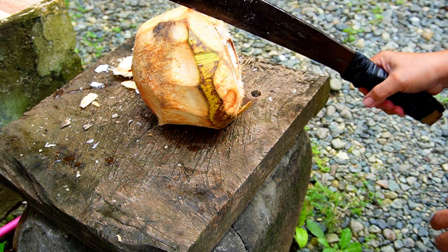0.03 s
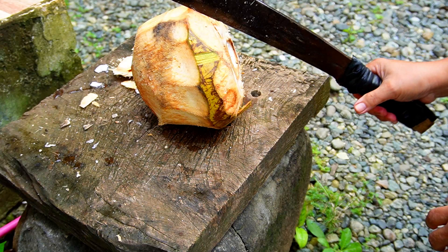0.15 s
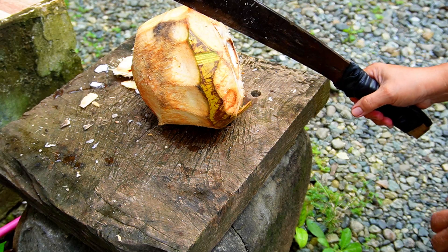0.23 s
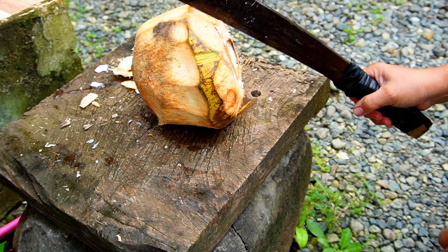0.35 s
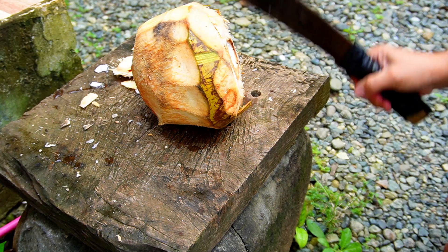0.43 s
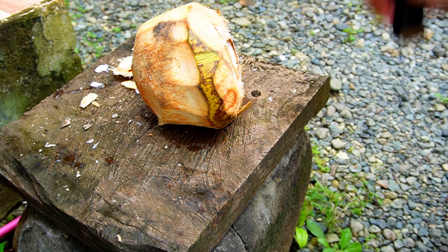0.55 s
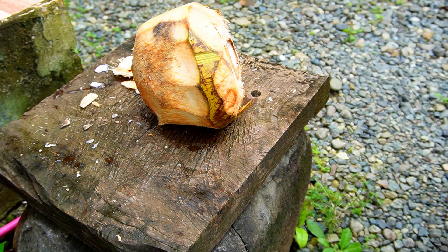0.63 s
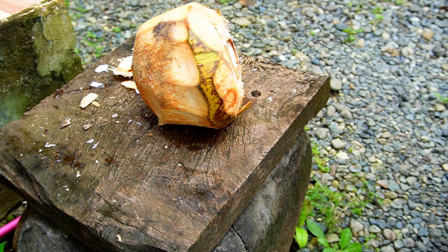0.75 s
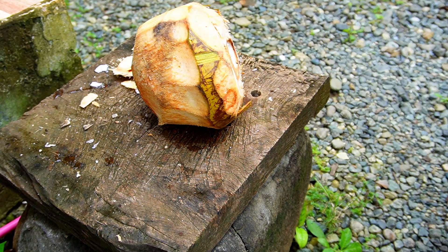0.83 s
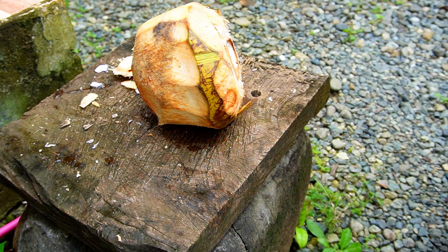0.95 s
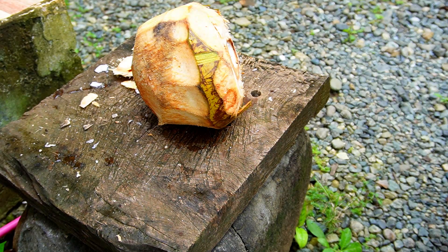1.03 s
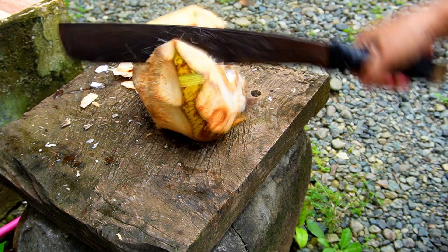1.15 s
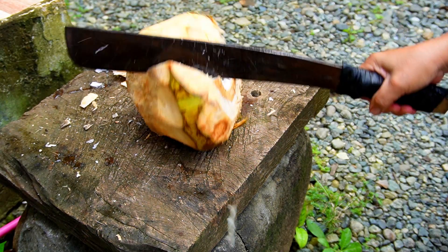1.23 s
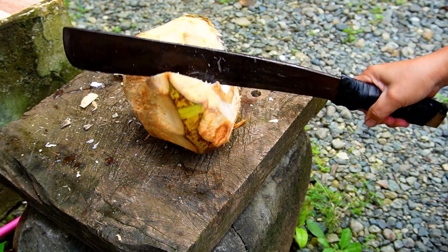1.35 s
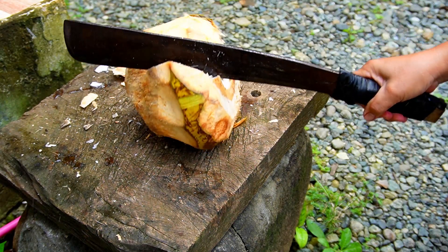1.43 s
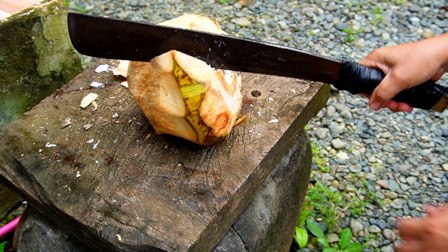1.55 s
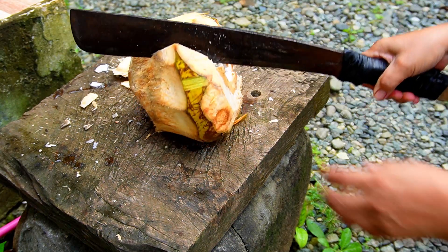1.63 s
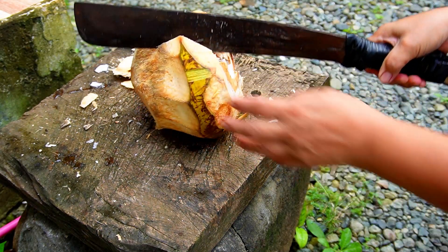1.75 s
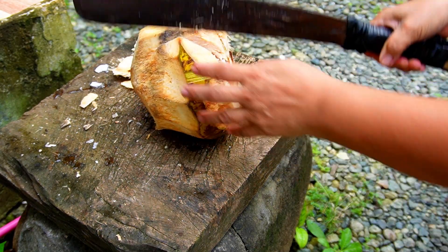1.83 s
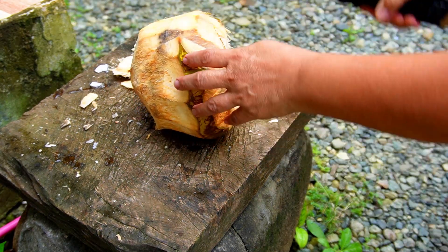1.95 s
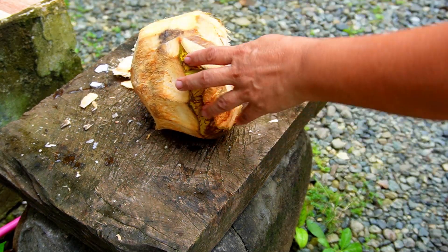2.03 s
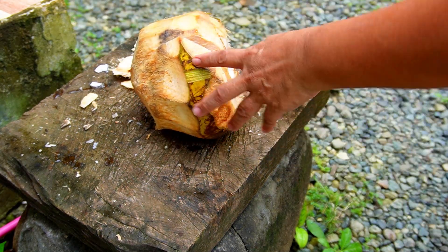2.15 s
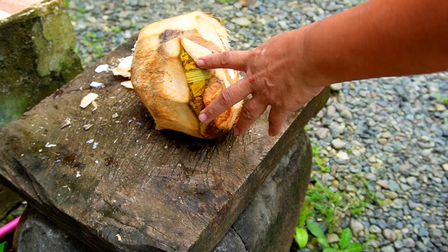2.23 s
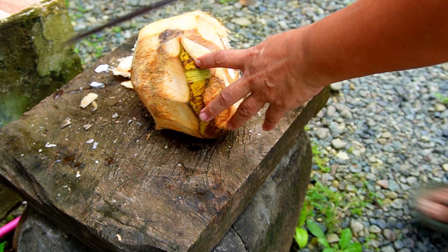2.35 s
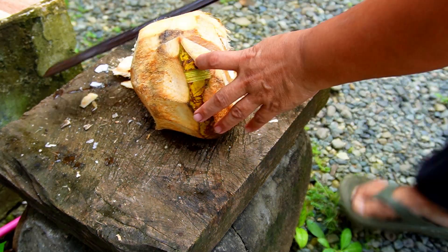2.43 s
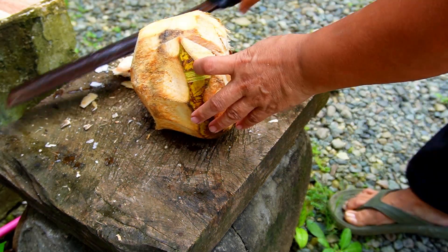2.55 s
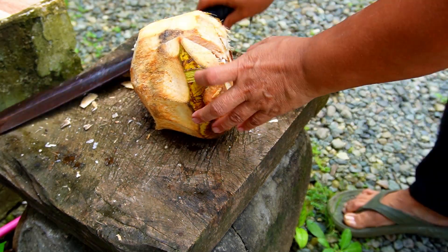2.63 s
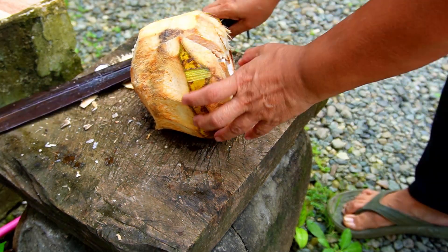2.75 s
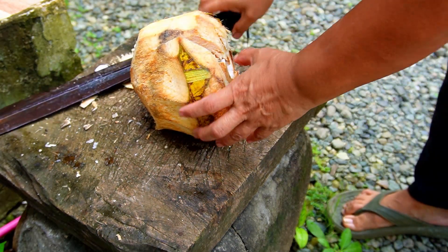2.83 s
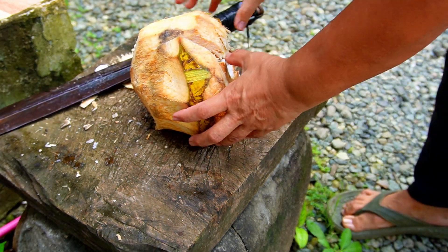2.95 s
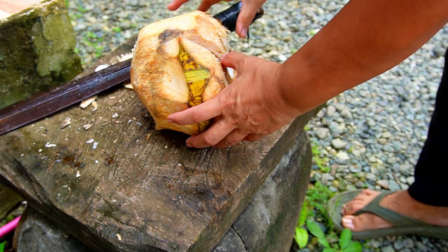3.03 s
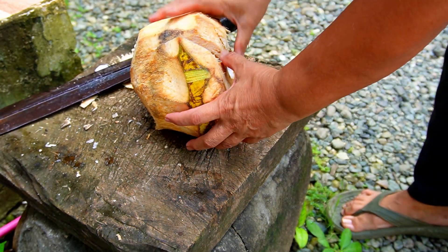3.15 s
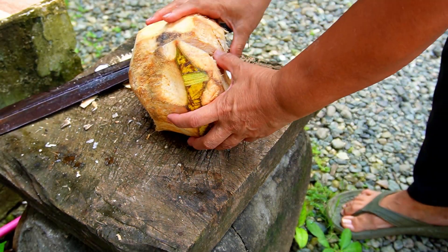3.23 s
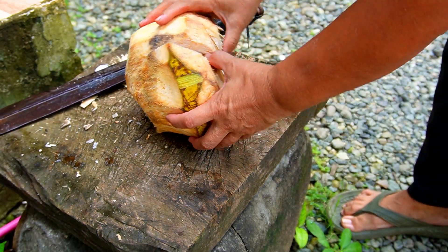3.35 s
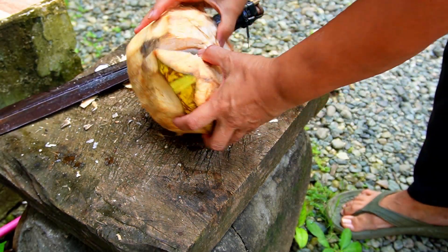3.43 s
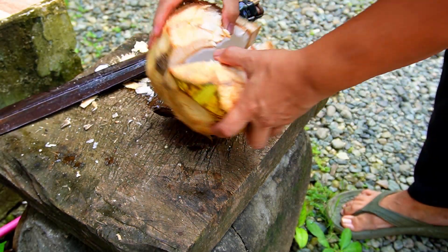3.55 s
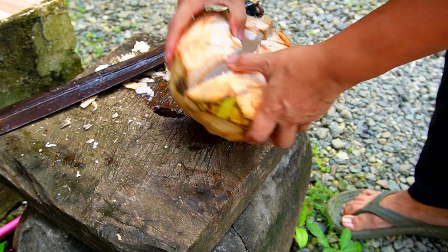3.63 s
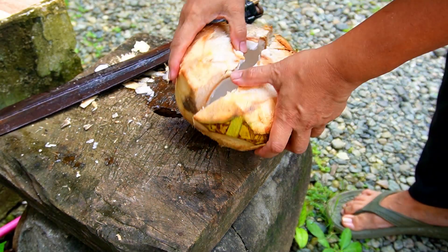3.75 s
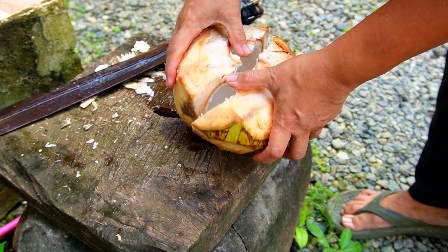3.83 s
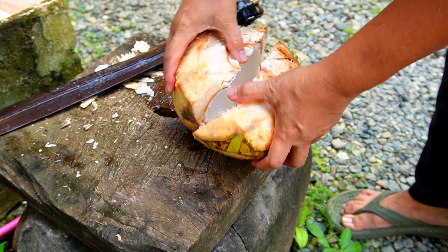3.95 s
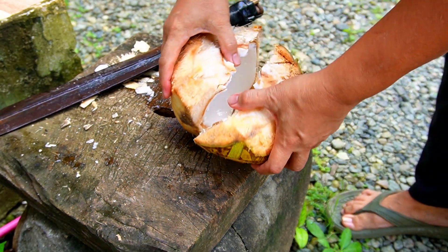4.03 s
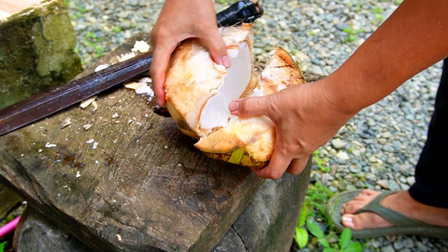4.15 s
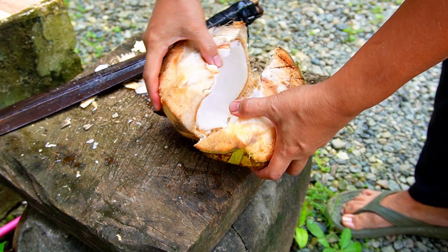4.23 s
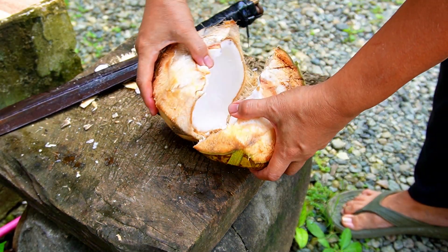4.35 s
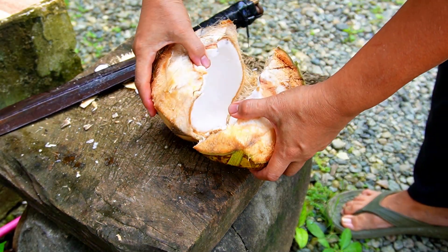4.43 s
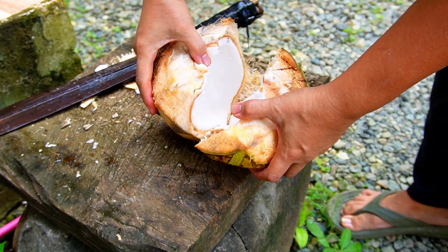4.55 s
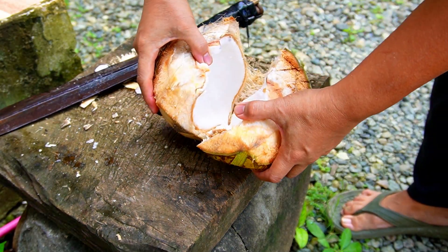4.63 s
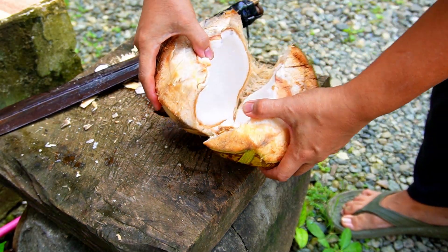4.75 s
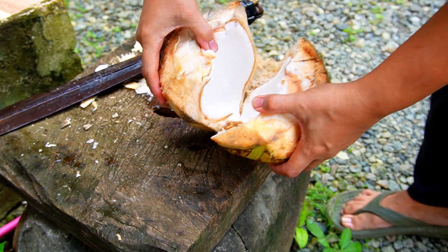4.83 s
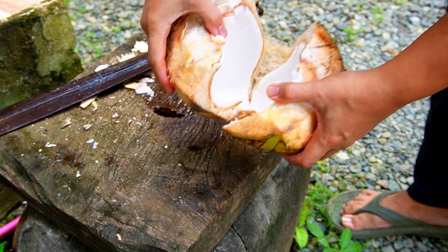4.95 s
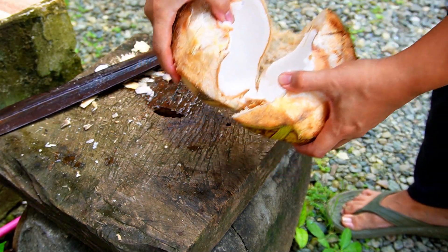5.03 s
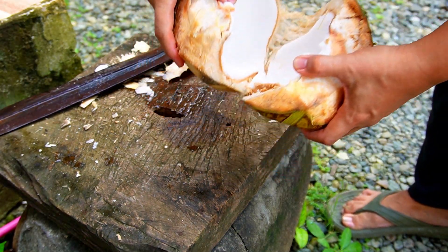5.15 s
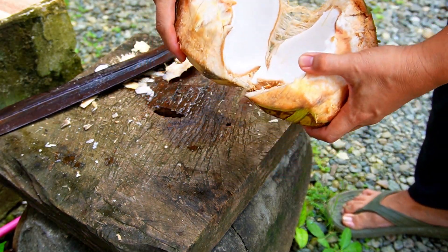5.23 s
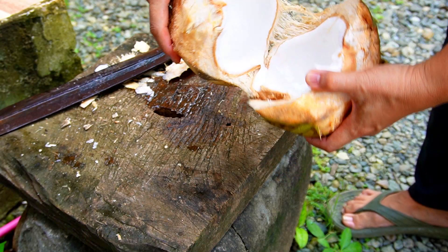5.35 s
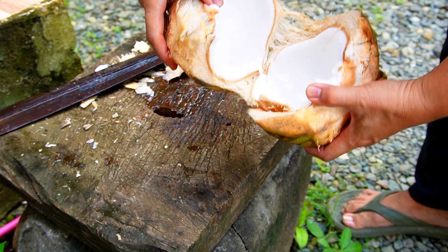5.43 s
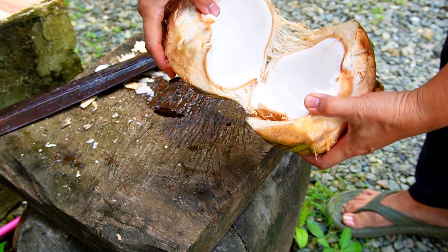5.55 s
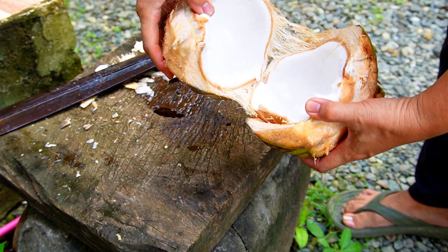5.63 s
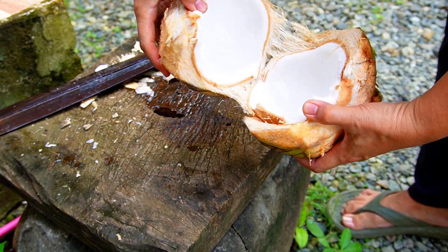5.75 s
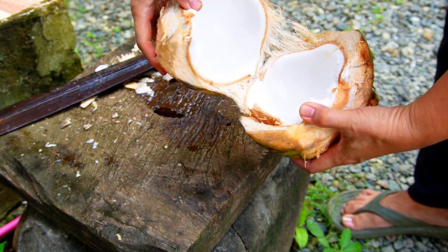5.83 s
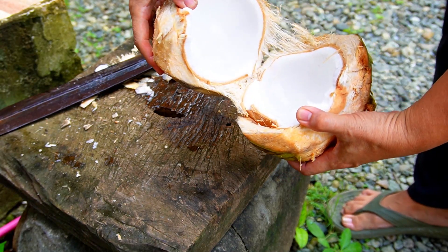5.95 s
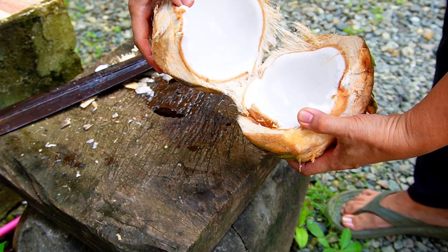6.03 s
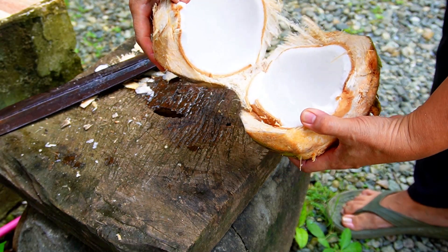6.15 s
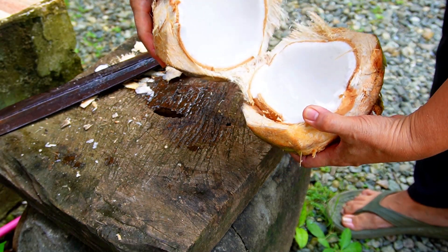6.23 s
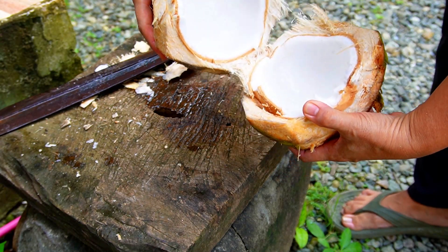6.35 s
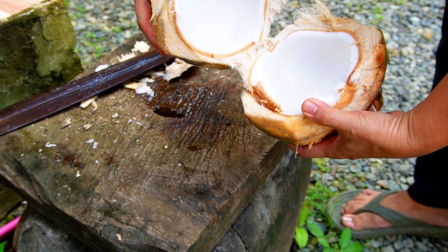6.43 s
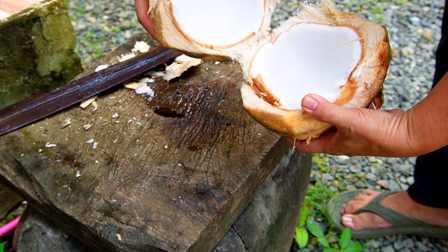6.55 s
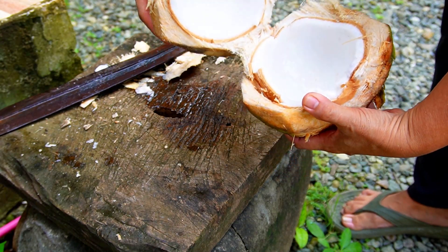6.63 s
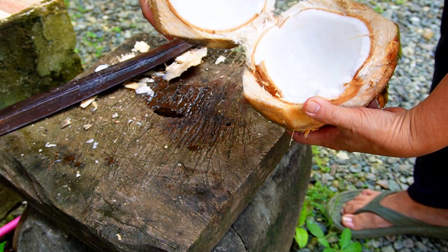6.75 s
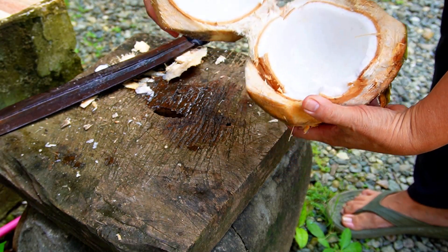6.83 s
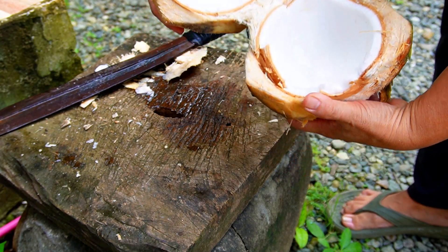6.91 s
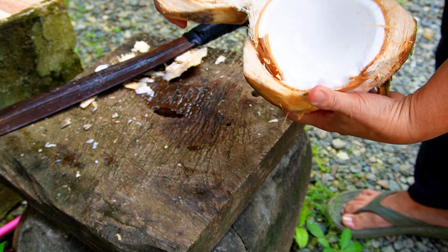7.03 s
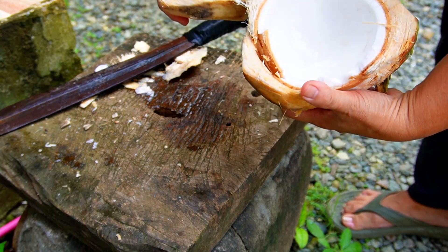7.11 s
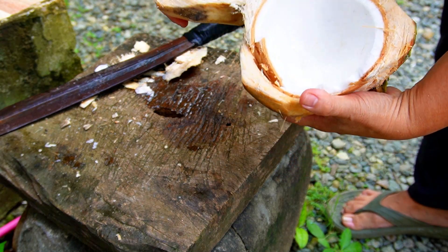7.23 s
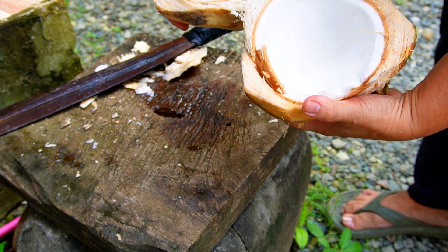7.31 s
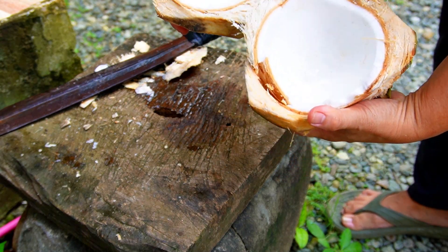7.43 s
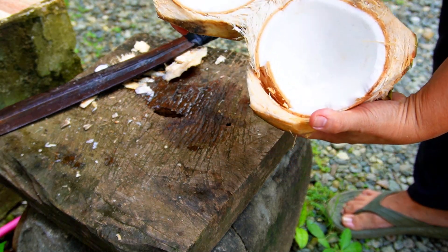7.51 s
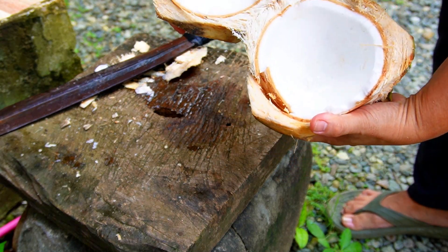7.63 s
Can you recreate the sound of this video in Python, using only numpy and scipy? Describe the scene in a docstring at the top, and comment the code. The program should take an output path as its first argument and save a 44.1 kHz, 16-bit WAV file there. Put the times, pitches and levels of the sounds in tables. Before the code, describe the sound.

A machete chops sharply into a husked coconut outdoors, then the blade clatters on wood and fibres rip and snap as the halves are pulled apart.

```python
"""A machete splits a husked coconut on a wooden block in a gravel yard, close to the microphone.
The edge cracks the shell and crunches through fibre; the blade is put down and knocks and rattles on the
ringing block. Sandals grind pebbles, hands rub the husk and pull the nut apart, fibres snap, water drips.
Behind: leaves in a breeze, a bird whistling falling notes and a slow engine thudding far away.
Grains, bursts and damped modes make the near sounds; echoes of the yard surround them."""
import sys
import numpy as np
from scipy import signal
from scipy.io import wavfile
from scipy.ndimage import map_coordinates

SR = 44100
rng = np.random.default_rng(int(sys.argv[2]) if len(sys.argv) > 2 else 0)


def persist_wave(psi):
    """Save psi, clipped to +-1, as 16-bit WAV."""
    counts = np.round(np.clip(psi, -1, 1) * 32767).astype(np.int16)
    wavfile.write(sys.argv[1], SR, np.atleast_2d(counts).T)


N = 338688
TIME = np.arange(N) / SR
SHORT = TIME[:4096]  # time axis of one brief sound, 93 ms


def amp(db):
    """Decibels to gain."""
    return 10 ** (np.asarray(db) / 20)


def unit(x):
    """Scales to rms 1."""
    return x / np.sqrt(np.mean(x ** 2) + 1e-20)


def peaked(x):
    """Scales to peak 1."""
    return x / (abs(x).max() + 1e-20)


def sine(hz):
    """Sine that follows a changing pitch."""
    return np.sin(2 * np.pi * np.cumsum(hz) / SR)


def over_time(points):
    """Reads a (t, value) table along the whole scene."""
    return np.interp(TIME, *np.transpose(points))


def read(points, hz):
    """Reads a spectrum on a log-frequency axis."""
    f, value = np.transpose(points)
    return np.interp(np.log(hz + 1), np.log(f + 1), value)


def add(mix, s, sound):
    """Mixes a sound in at time s."""
    part = mix[max(round(s * SR), 0):][:len(sound)]
    part += sound[:len(part)]


def colour(x, points):
    """Causal filter with the given (f/Hz, level/dB) spectrum, floored at -100 dB."""
    hz = abs(np.fft.fftfreq(4096, 1 / SR))
    log_gain = np.log(amp(np.maximum(read(points, hz), -100)))
    minimum_phase = np.exp(np.conj(signal.hilbert(log_gain)))
    taps = np.fft.ifft(minimum_phase).real[:2048]
    return signal.oaconvolve(x, taps)[:len(x)]


def band(x, low_hz, high_hz, order=2):
    """Band-pass."""
    high_hz = min(max(high_hz, low_hz + 1), SR / 2 - 1)
    sos = signal.butter(order, [low_hz, high_hz], "band", fs=SR, output="sos")
    return signal.sosfilt(sos, x)


def wander(rate):
    """Smooth random drift of rms 1, with rate random knots a second."""
    knots = rng.standard_normal(4096)
    return unit(map_coordinates(knots, [TIME * rate], order=3, mode="wrap"))


def burst(decay):
    """A puff of noise that dies away."""
    return rng.standard_normal(len(SHORT)) * np.exp(-SHORT / decay)


def grains(per_s, spread_db, decay, count=10):
    """Tiny fractures at random times, of uneven size, each with one of count short noise rings."""
    size = amp(spread_db * np.minimum(rng.exponential(1, N), 4)) * (rng.random(N) < per_s / SR)
    kind = rng.integers(0, count, N)
    return sum(signal.oaconvolve(size * (kind == k), unit(burst(decay)))[:N] for k in range(count))


def gesture(s, length, attack, release):
    """Gain over time: smooth attack, hold, smooth release."""
    ramp = np.clip(np.minimum((TIME - s) / attack, (s + length - TIME) / release), 0, 1)
    return np.sin(np.pi / 2 * ramp)


def surge(s, peak_after, width):
    """Gain over time: opens within 4 ms from s and follows a bell around its peak."""
    bell = np.exp(-np.minimum(((TIME - s - peak_after) / width) ** 2, 50))
    return np.clip((TIME - s) / 0.004, 0, 1) * bell


# how long the yard echoes last: f/Hz, t60/s
YARD_T60 = [(150, 0.33), (500, 0.61), (1500, 0.54), (4000, 0.4), (8000, 0.35), (15000, 0.41)]


def yard(x):
    """Scattered echoes from walls and trees, each band dying at its own speed."""
    t = TIME[:SR * 2 // 3]
    hits = rng.random(len(t)) < 3000 / SR
    echoes = rng.standard_normal(len(t)) * hits * np.clip(t / 0.0033, 0, 1)
    hz, frames, z = signal.stft(echoes, SR, nperseg=256)
    fade = amp(-60 * frames / read(YARD_T60, hz)[:, None])
    tail = signal.istft(z * fade, SR, nperseg=256)[1]
    return signal.oaconvolve(x, tail / np.linalg.norm(tail))[:N]


# stereo width of direct sound at the microphone: f/Hz, side filter level/dB
NEAR_WIDTH = [(60, -37), (200, -42), (500, -20), (1000, -27), (2000, -19), (4000, -12.5), (8000, -9),
              (14000, -7)]
# stereo width of echoes and air: f/Hz, side filter level/dB
FAR_WIDTH = [(60, -29), (110, -21), (200, -12.5), (380, -10), (700, -10.5), (1290, -10.5), (2380, -10.5),
             (4400, -7), (8120, -3.5), (15000, 1.5)]


def place(x, wet_db):
    """Direct sound and yard echoes as (mid, side); the microphone's ports differ mostly in the treble."""
    scatter = burst(0.004)
    side = signal.oaconvolve(x, scatter / np.linalg.norm(scatter))[:N]
    mid = x + amp(wet_db) * yard(x)
    return np.array([mid, colour(side, NEAR_WIDTH) + amp(wet_db) * colour(yard(x), FAR_WIDTH)])


# tone of the leaves: f/Hz, level/dB
LEAF_TONE = [(15, -39), (25, -9), (48, -7), (108, -5), (130, 8.5), (175, -5.5), (263, -22.5), (344, -10.5),
             (384, -22), (1160, -15), (1330, -10), (1480, -13.5), (2610, -13.5), (5000, -23.5),
             (16000, -52.5)]
# tone of their fine hiss: f/Hz, level/dB
HISS_TONE = [(2940, -18), (5000, -1), (5840, -14), (6570, -40), (8420, 1), (10700, -15.5), (14400, -16),
             (16000, -43)]
# the breeze in the leaves: t/s, level/dB
BREEZE = [(0, -45), (1.16, -44.5), (2.7, -42.5), (4.0, -46), (6.4, -46.5), (7.1, -45.5), (7.68, -46.5)]


def air():
    """Low outdoor rumble and the soft hiss of leaves from filtered noise, as (mid, side)."""
    def wash():
        """One independent stream of rumble and leaves."""
        rumble = amp(-54.0) * unit(band(rng.standard_normal(N), 51, 270))
        leaves = unit(band(colour(rng.standard_normal(N), LEAF_TONE), 343, 26000))
        leaves += amp(-20.5) * unit(colour(rng.standard_normal(N), HISS_TONE))
        return rumble + leaves * amp(over_time(BREEZE) + 0.69 * wander(14))
    return np.array([wash(), colour(wash(), FAR_WIDTH)])


# engine speed: t/s, firing rate f/Hz
SPEED = [(0, 15.08), (1.2, 15.1), (1.8, 15.32), (4, 15.36), (6, 15.42), (7.68, 15.55)]
# exhaust orders: multiple of the firing rate, rms level/dB
EXHAUST = [(2, -80), (3, -59.5), (4, -53.5), (5, -56.5), (6, -57.5), (8, -60.5), (9, -51), (10, -62),
           (11, -54), (12, -57.5), (13, -72.5), (14, -65.5), (15, -60.5), (16, -63)]
# a low wavering hum beside the engine: t/s, rms level/dB
HUM = [(0, -49), (1.2, -48), (2.2, -66), (7.68, -52.5)]


def engine():
    """A far single cylinder: low exhaust orders, and a metallic ring that is struck once a cycle."""
    cycles = np.cumsum(over_time(SPEED)) / SR
    exhaust = np.zeros(N)
    for k, db in EXHAUST:
        order = np.cos(2 * np.pi * (round(k) * cycles + rng.random()))
        exhaust += amp(db + 1.85 * wander(3.005)) * np.sqrt(2) * order
    stroke = np.exp(-((cycles + 0.5) % 1 - 0.5) ** 2 / 0.09 ** 2)  # a short bell in every cycle
    clack = unit(stroke * amp(2 * wander(15)) * sine(1335 + 25 * wander(60)))
    whirr = unit(band(rng.standard_normal(N), 1293, 1356))
    hum = amp(over_time(HUM)) * np.sqrt(2) * sine(121 + 3 * wander(6.3))
    return exhaust + hum + amp(-56.5) * clack + amp(-59.0) * whirr


# bird calls: t/s, length/s, middle pitch f/Hz, sag/(Hz per s), slur/Hz, level/dB at mid call
WHISTLES = [(0.289, 0.43, 3245, 700, 310, -48), (0.718, .42, 2780, 80, 4, -53.5),
            (2.25, 0.46, 3254, 680, 89.5, -46), (3.537, .54, 3210, 850, 420.5, -46),
            (4.63, .41, 3310, 2000, 104, -51.5), (6.841, .42, 3300, 1900, 160.5, -50.5)]
# the trees answer the bird: delay t/s, level/dB
TREE_ECHOES = [(.052, -31), (.087, -27)]
SLUR_IN_S, SLUR_OUT_S = 0.04, 0.046  # a call slides down into its note and drops off at the end
WHISTLE_ATTACK_S, WHISTLE_RELEASE_S = 0.069, 0.01
WHISTLE_SWELL_DB_PER_S = 19  # a call grows louder as it falls


def bird():
    """Sagging, nearly pure whistles; the trees send back late copies that beat with the falling note."""
    out = np.zeros(N)
    waver, flutter = 1 + 0.005 * wander(70), amp(2.2 * wander(25))
    for s, length, hz, sag, slur_hz, db in WHISTLES:
        t = np.clip(TIME - s, 0, length)
        from_middle = t - length / 2
        slur = np.exp(-t / SLUR_IN_S) - np.exp((t - length) / SLUR_OUT_S)
        pitch = hz - sag * from_middle + slur_hz * slur
        level = amp(db + WHISTLE_SWELL_DB_PER_S * from_middle)
        level = level * gesture(s, length, WHISTLE_ATTACK_S, WHISTLE_RELEASE_S)
        out += level * flutter * sine(pitch * waver)
    heard = out.copy()
    for delay, db in TREE_ECHOES:
        add(heard, delay, amp(db) * out)
    return heard


# sandals on gravel: t/s, level/dB, rise/s, decay/s
STEPS = [(2.261, -31, 0.019, 0.017), (2.455, -23, 0.0024, 0.011), (2.465, -22.5, 0.0024, 0.0044),
         (2.473, -23.5, 0.0045, 0.017), (2.496, -29, 0.0018, .008), (2.34, -35, .001, 0.0035),
         (2.794, -37.5, 0.0055, 0.022), (2.971, -22.5, 0.0064, 0.017), (2.989, -21, 0.0089, 0.036),
         (3.046, -23.5, 0.0028, 0.0045), (3.11, -33, 0.0027, 0.014), (3.145, -32, 0.0025, 0.0099),
         (3.71, -43, 0.0063, 0.012)]
# tone of the pebbles: f/Hz, level/dB
GRAVEL_TONE = [(150, -16), (300, -5), (520, -14), (640, -6), (1150, -1.5), (2250, -3.5), (4800, -2),
               (8000, -7), (11000, -13), (14500, -23), (16000, -32)]


def steps():
    """Pebbles grind under each footfall, too small to carry any bass."""
    power = np.zeros(N)
    for s, db, rise, decay in STEPS:
        onset = np.clip((TIME - s) / rise, 0, 1)
        fade = np.exp(-np.maximum(TIME - s - rise, 0) / decay)
        power += (amp(db) * onset * fade) ** 2
    pebbles = colour(grains(per_s=2800, spread_db=2.5, decay=0.00031), GRAVEL_TONE)
    return np.sqrt(power) * unit(band(pebbles, 190, 20000))


# coconut water on the block: t/s, slap level/dB, pitch scale f/Hz (starts at 0.976 of it), spray level/dB
DRIPS = [(7.1157, -11.5, 4430, -3), (7.135, -35, 6000, -4), (7.1695, -44, 6000, -8),
         (7.2559, -11, 5460, -1), (7.265, -27, 6100, 7), (7.355, -26, 3600, -9), (7.365, -27, 3600, 8),
         (7.397, -16, 3790, 2.5), (7.459, -36, 6500, 14), (7.483, -32, 3240, 8), (7.599, -37, 5470, 9)]


def drips():
    """A drop slaps the wet wood: its pitch falls as it spreads, and fine spray follows."""
    out = np.zeros(N)
    for s, db, hz, splash_db in DRIPS:
        pitch = hz * (0.37 + 0.606 * np.exp(-SHORT / 0.00198))
        slap = sine(pitch) * np.exp(-SHORT / 0.0016)
        tick = amp(-1.0) * peaked(band(burst(0.000083), 3900, 14000))
        spray = band(burst(0.005) * rng.random(len(SHORT)) ** 3, 900, 7000)
        add(out, s, amp(db) * (slap + tick + amp(splash_db) * spray))
    return out


# fingers and blade on the husk, first row a light footfall: t/s (sounds 0.955 ms later), level/dB (peak lies 5
# dB lower), f/Hz
TAPS = [(0.058, -18.5, 4500), (1.0785, -19, 3600), (1.0793, -15.5, 830), (1.1256, -21, 1600),
        (1.9825, -20, 4030), (2.1910, -19.5, 1430), (2.323, -12, 2270), (2.5635, -8.5, 1610),
        (3.185, -22.5, 1540), (3.2950, -25, 1210), (4.7155, -11.5, 1660), (5.138, -14, 1830)]


def taps():
    """Light, dry, damped taps on the husk, and one light footfall: a noise burst in a band around its pitch."""
    out = np.zeros(N)
    for s, db, hz in TAPS:
        touch = burst(0.0018)
        tap = band(touch, hz * 0.64, hz * 1.11) + amp(-2.0) * band(touch, 800, 4200)
        add(out, s + 0.000955, amp(db - 5) * peaked(tap))
    return out


# hands rub over the husk: t/s, length/s, level/dB
RUBS = [(0.041, .04, -38.5), (1.564, 0.076, -43), (1.782, 0.11, -49), (1.987, 0.48, -45),
        (2.397, 0.59, -46.5), (3.524, 0.27, -52), (3.8, 0.3, -57.5), (4.515, .1, -51.5)]
# tone of rubbed and torn fibre: f/Hz, level/dB
TEAR_TONE = [(200, -6.5), (500, -18.5), (850, 2.5), (1300, -10), (2500, 3), (3900, 2), (5200, -2),
             (8000, -5.5), (10500, -13), (13000, -18), (16000, -26)]


def rubs():
    """Fibres rustle under the hands as a dense stream of tiny grains."""
    rustle = unit(colour(grains(per_s=6700, spread_db=7.0, decay=0.00035), TEAR_TONE))
    return rustle * sum(amp(db) * gesture(s, length, length / 2, length / 2) for s, length, db in RUBS)


# the hands pull the halves apart: t/s, length/s, level/dB
PULLS = [(4.74, 0.16, -48.5), (5.096, .15, -38.5), (5.296, 0.16, -36), (5.572, 0.16, -40.5),
         (5.708, 0.31, -50), (5.973, 0.308, -48.5), (6.688, .55, -53)]
PULL_EDGE_S = 0.042  # a pull builds up and lets go this fast


def pulls():
    """Fibres tear in a fine crackle at each pull."""
    fibres = unit(colour(grains(per_s=1100, spread_db=6, decay=0.00089), TEAR_TONE))
    return fibres * sum(amp(db) * gesture(s, length, PULL_EDGE_S, PULL_EDGE_S) for s, length, db in PULLS)


# tone of a snapping fibre: f/Hz, level/dB
SNAP_TONE = [(200, -19), (600, -6), (1500, -2.5), (2800, 1), (4500, 7), (6500, -2), (9000, -2.5),
             (12000, -9.5), (16000, -23)]
OPEN_S, THIN_DB, THIN_PER_S = 4.7, -59, 30


def thin_fibres():
    """Thin fibres give way at random once the nut is open."""
    thin = unit(colour(grains(per_s=THIN_PER_S, spread_db=1.0, decay=0.0009), SNAP_TONE))
    return thin * amp(THIN_DB) * (TIME > OPEN_S)


# thick fibres: t/s, crack peak level/dB, ring f/Hz, splintering level/dB against the crack
SNAPS = [(5.114, -24, 3600, 5.5), (5.1904, -17.5, 4550, -3), (5.269, -22, 4000, -2),
         (5.3285, -18.5, 3860, 2.5), (5.3778, -1.5, 3600, -13), (5.3956, -11.5, 6900, -16),
         (5.4192, -14.5, 4600, -6.5), (5.5032, -25, 5500, -6), (5.577, -25, 2700, -5),
         (5.596, -22.5, 4800, 1.5), (5.605, -15.5, 5140, -4.5), (5.664, -29, 4460, 5),
         (5.68, -25.5, 3930, 5.5), (5.778, -23.5, 2620, -9), (5.8469, -29, 5000, -20),
         (6.049, -21, 4550, -8), (6.0777, -22, 4340, -15), (6.108, -24, 4400, -3), (6.251, -19, 3700, -4),
         (6.511, -22.5, 5600, -2.5), (6.783, -20.5, 4800, -7.5), (6.864, -21, 2920, -4)]


def snaps():
    """Thick fibres snap singly: a click with a short ring, a bright edge and splinters after it."""
    out = np.zeros(N)
    for s, db, hz, splinter_db in SNAPS:
        ring = np.sin(2 * np.pi * hz * SHORT) * np.exp(-SHORT / 0.00067)
        crack = peaked(colour(signal.unit_impulse(len(SHORT)), SNAP_TONE)) + amp(-13.5) * ring
        scatter = burst(0.0045) * rng.random(len(SHORT)) ** 4
        splinters = peaked(signal.oaconvolve(scatter, crack)[:len(SHORT)])
        edge = peaked(band(burst(0.00023), 7800, 14000)) * amp(-1.5 + 0.84 * db)  # harder is brighter
        add(out, s, amp(db) * (peaked(crack) + edge + amp(splinter_db) * splinters))
    return out


# machete and nut on the block: t/s, rms level/dB over the first 10 ms, hardness f/Hz
KNOCKS = [(2.6660, -8, 4200), (2.7030, -14, 1440), (2.7055, -10.5, 1270), (2.7244, -17, 1730),
          (2.7258, -9.5, 1750), (2.8727, -17.5, 1530), (3.749, -36, 1570), (3.803, -42, 980)]
# what the block rings with: f/Hz, level/dB, t60/s
BLOCK_MODES = [(843, 6, 0.092), (850, 7, 0.086), (934, 3, 0.053), (1035, 1.5, 0.027), (1113, -11, 0.2),
               (1243, 3, 0.1), (1300, -10, 0.048), (1480, -14, 0.015), (1660, 7.5, 0.052), (1750, 3, 0.019),
               (2150, 2, 0.044), (2400, 7, 0.027), (2700, 10, 0.044), (3220, 3, 0.026), (3600, -11, 0.11),
               (4200, 0, 0.028)]


def knocks():
    """A bending wave sinks from treble to the block's lowest note; softer contacts lose the treble."""
    out = np.zeros(N)
    for s, db, hard_hz in KNOCKS:
        pitch = 825 + 0.642 * hard_hz * np.exp(-SHORT / 0.001566)
        bend = sine(pitch) * (1 - np.exp(-SHORT / 0.001)) * np.exp(-SHORT / 0.007)
        ring = np.zeros(len(SHORT))
        for hz, mode_db, t60 in BLOCK_MODES:
            ring += amp(mode_db - 60 * SHORT / t60) * np.sin(2 * np.pi * (hz * SHORT + rng.random()))
        contact = band(burst(0.0018), 970, 13000)
        blow = band(amp(15.0) * bend + ring + amp(11.5) * contact, 720, hard_hz)
        add(out, s, amp(db) * blow / np.std(blow[:SR // 100]))
    return out


# tone of the chattering blade: f/Hz, level/dB
RATTLE_TONE = [(71, -48), (120, -22), (221, -13), (527, -34), (838, -0.5), (1010, -21), (1410, 0),
               (1510, -19), (1820, -7), (1960, -20), (2890, -21), (3120, -14), (3890, -25), (4680, -27),
               (10000, -48), (13000, -89), (22000, -120)]
RATTLE_DB, RATTLE_S = -20, 0.069


def rattle():
    """The loose blade chatters from its first knock until it lies still."""
    chatter = unit(colour(grains(per_s=2100, spread_db=-0.5, decay=0.00071), RATTLE_TONE))
    return amp(RATTLE_DB) * surge(KNOCKS[0][0], 0, RATTLE_S) * chatter


# dull pushes on the nut: t/s, peak level/dB, pitch of the push f/Hz, ring length as a share of t60
THUDS = [(1.18, -21.5, 390, 0.67), (1.19, -16, 680, 0.81), (1.218, -15.5, 420, 0.8),
         (1.229, -16.5, 242, 0.87), (1.235, -30, 85, 1), (1.368, -35.5, 517, 1), (1.445, -37, 517, 1.2),
         (2.679, -27.5, 190, 1.6), (2.705, -23.5, 338, 1.3), (3.738, -18, 267, 0.57),
         (3.835, -26.5, 205, 0.86)]
# what the hollow nut on its block rings with: f/Hz, level/dB, t60/s
NUT_MODES = [(65.6, -2, 0.18), (123, -7, 0.14), (176, -3, 0.17), (225, 6, .045), (317, 1.5, 0.055),
             (383, -3.5, 0.082), (440, -6, 0.13), (618, 4.5, 0.047)]
THUD_SPREAD_OCTAVES = 0.54  # modes far from the pitch of a push are hardly stirred


def thuds():
    """Each push rings the damped modes of the heavy nut near its pitch; a firm grip damps them sooner."""
    out, t = np.zeros(N), TIME[:SR // 4]
    for s, db, push_hz, share in THUDS:
        ring = np.zeros(len(t))
        for hz, mode_db, t60 in NUT_MODES:
            stirred = np.exp(-(np.log2(hz / push_hz) / THUD_SPREAD_OCTAVES) ** 2)
            ring += stirred * amp(mode_db - 60 * t / (t60 * share)) * np.sin(2 * np.pi * hz * t)
        add(out, s, amp(db) * peaked(ring * (1 - np.exp(-t / 0.0023))))
    return out


# the blade bites into the shell: t/s, peak level/dB, decay/s
CRACKS = [(1.1797, 4, 0.001), (1.1813, 2.5, 0.0015), (1.1837, -2.5, 0.0013), (1.1893, -13, 0.00091),
          (1.219, -14, 0.00064), (1.2299, -8, 0.0013), (1.2377, -7, 0.0008), (1.256, -12, 0.0027)]
# tone of the cracking shell: f/Hz, level/dB
CRACK_TONE = [(120, -41), (200, -21), (623, -8.5), (1180, 1.5), (2130, -5), (3370, 4), (4120, -9),
              (6280, -5), (7410, -12), (7830, -14), (9230, -15), (11500, -24), (16000, -32)]
# tone of the splitting fibre: f/Hz, level/dB
SPLIT_TONE = [(47, -39), (80, -15), (422, -6), (515, -11), (615, -5), (751, -12.5), (1120, -9),
              (1430, -11.5), (1740, -2.5), (1900, -5), (3620, -4.5), (3870, -6), (8990, -16.5),
              (12000, -29), (16000, -49)]
# the blade enters the husk, meets most resistance a moment later and slows to a stop
CHOP_S, DEEPEST_AFTER_S, DRIVE_S, DRIVE_DB = 1.164, 0.068, 0.039, -14.5
# the parted fibres go on creaking
SETTLE_DB, SETTLE_DB_PER_S = -23, 127


def chop():
    """The edge cracks the shell and crunches through the wet fibre in uneven slips."""
    slips = amp(1.4 * wander(400))
    since = TIME - CHOP_S - DEEPEST_AFTER_S
    settle = (since > 0) * amp(SETTLE_DB - SETTLE_DB_PER_S * abs(since))
    force = np.hypot(amp(DRIVE_DB) * surge(CHOP_S, DEEPEST_AFTER_S, DRIVE_S), settle)
    fibre = colour(grains(per_s=4000, spread_db=0.5, decay=0.0004), SPLIT_TONE)
    out = force * unit(slips * fibre)
    for s, db, decay in CRACKS:
        fracture = np.sign(burst(1)) * np.exp(-SHORT / decay)  # noise of random signs
        add(out, s, amp(db) * peaked(colour(fracture, CRACK_TONE)))
    return out


def scene():
    """Everything in the yard, left and right."""
    husk = rubs() + pulls() + thin_fibres() + snaps()
    block = knocks() + rattle() + thuds()
    mid, side = (air() + place(bird(), wet_db=2) + place(steps(), wet_db=-14)
                 + place(drips(), wet_db=-21.5) + place(taps(), wet_db=-9.0)
                 + place(husk, wet_db=-14.5) + place(block, wet_db=-34) + place(chop(), wet_db=-11.0))
    mid = mid + engine()
    return np.array([mid + side, mid - side])


EDGE_HZ = 16200  # upper limit of the recorded band


def record(dry):
    """The loudest peaks are rounded off by overload; then the band limit."""
    squashed = dry / (1 + (dry / 0.92) ** 8) ** (1 / 8)
    low_pass = signal.firwin(511, EDGE_HZ, window=("kaiser", 9), fs=SR)
    return signal.oaconvolve(squashed, low_pass[None], "same")


dry = scene()
out = record(dry)
persist_wave(out)
```